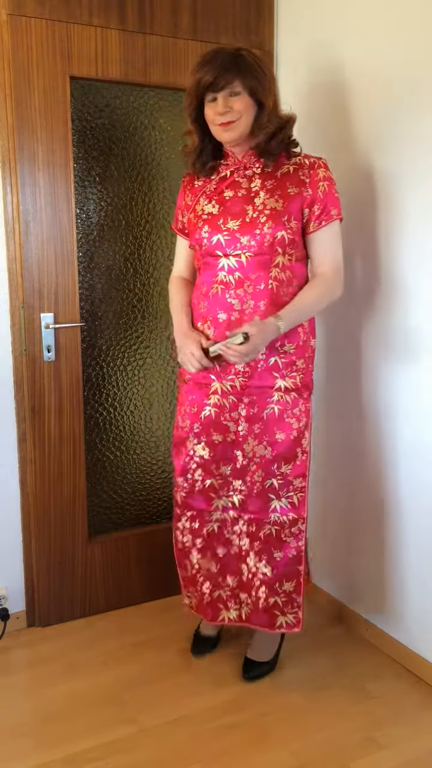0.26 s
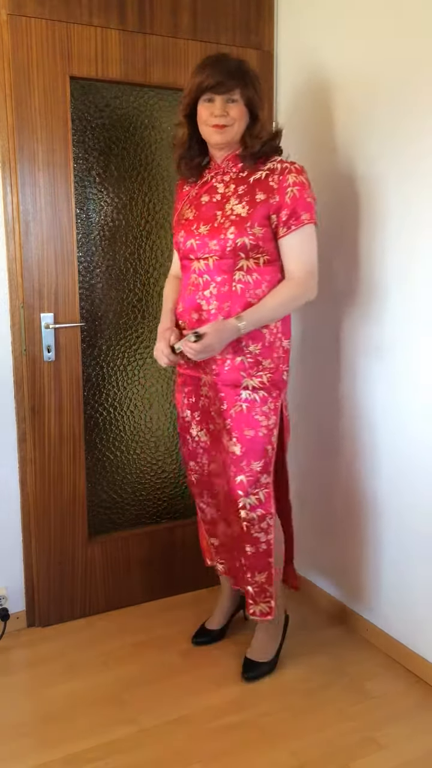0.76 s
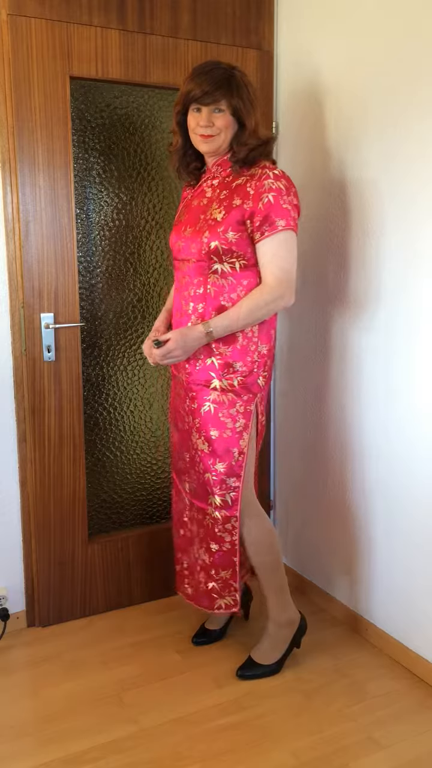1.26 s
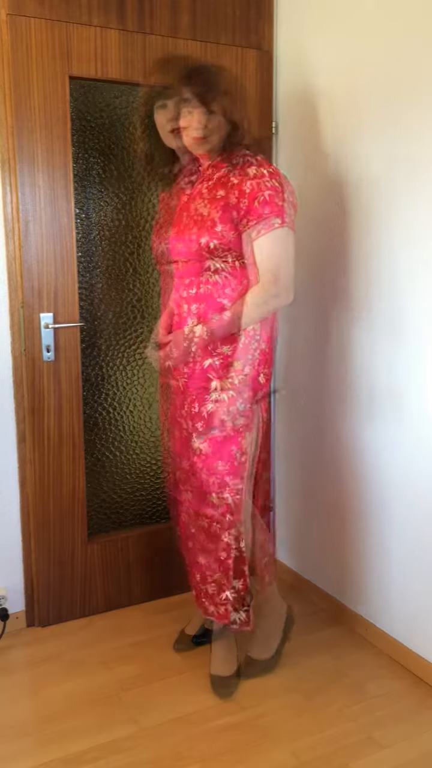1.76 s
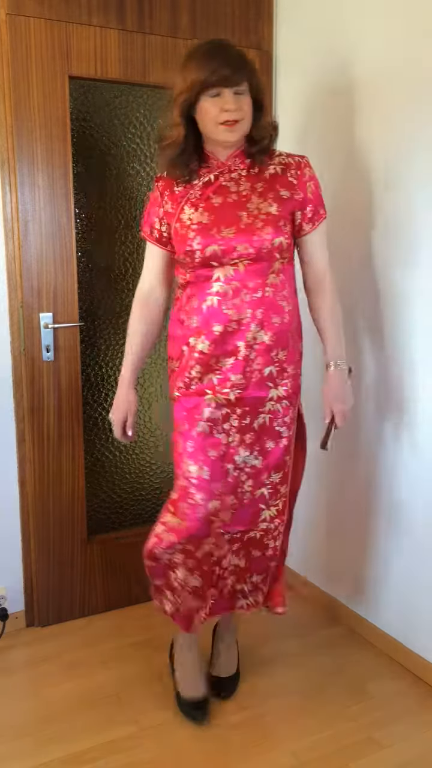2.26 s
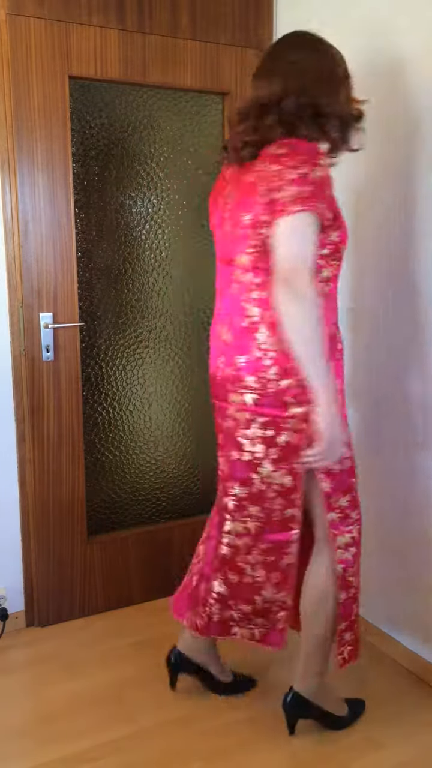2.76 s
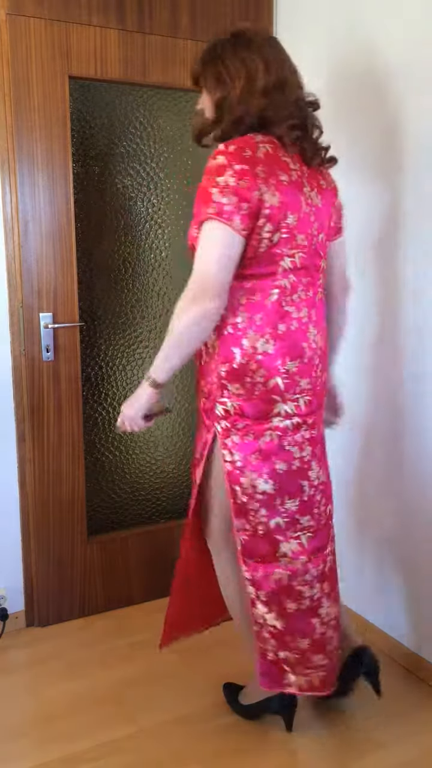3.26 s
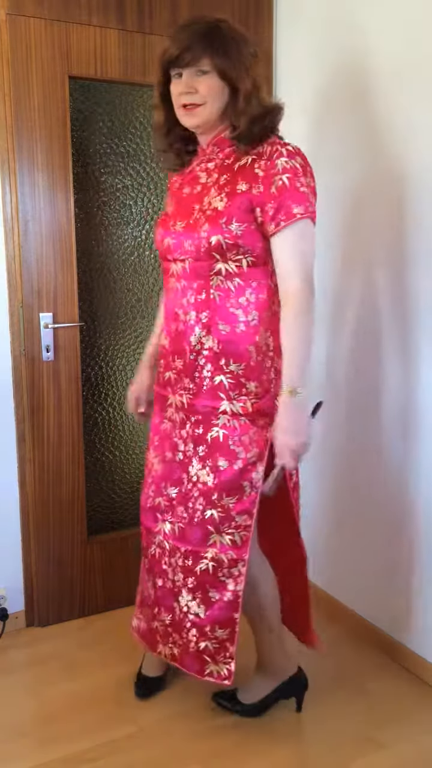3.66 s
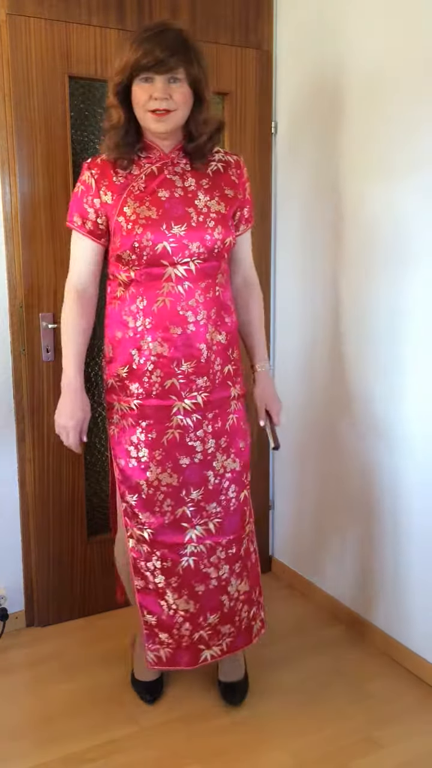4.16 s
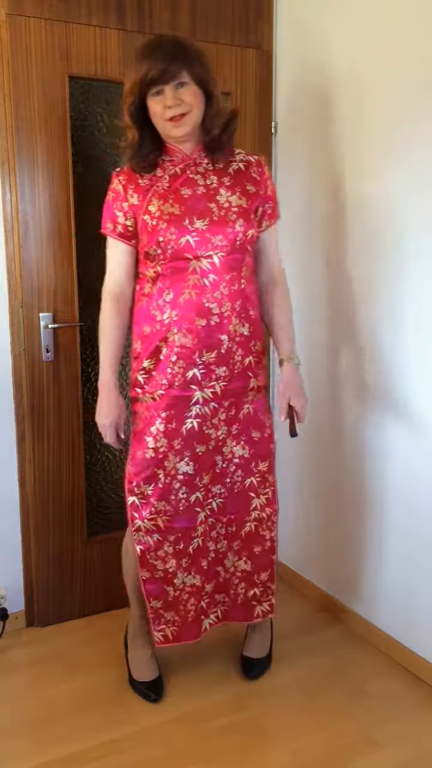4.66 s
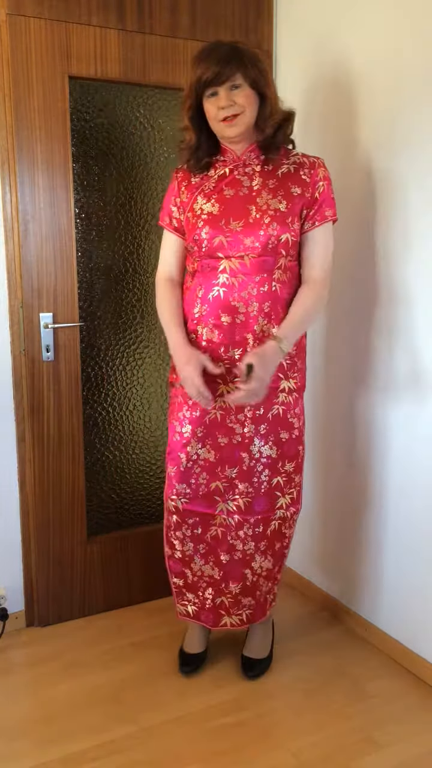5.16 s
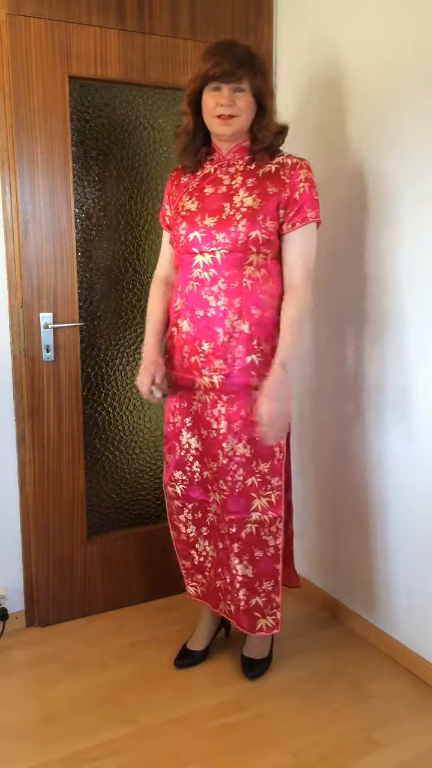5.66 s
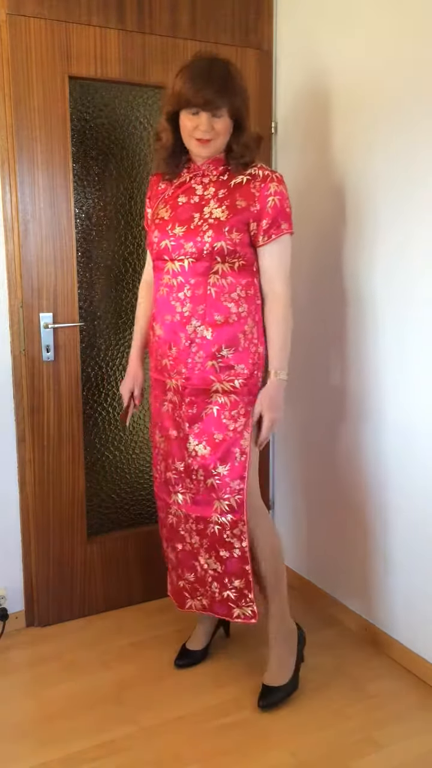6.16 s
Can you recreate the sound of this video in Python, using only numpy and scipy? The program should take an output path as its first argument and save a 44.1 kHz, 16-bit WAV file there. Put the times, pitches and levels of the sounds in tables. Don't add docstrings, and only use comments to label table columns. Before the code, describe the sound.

Someone in high heels shifts and turns on a laminate floor in a small, bare, lively room. One firm knock comes early, a softer one follows, then two loud steps with swishing satin. A short rising sole scrape marks the end of the turn, followed by lighter heel clicks and small thuds. The fairly close microphone has faint hiss and low building rumble.

```python
import sys
import numpy as np
from scipy import signal
from scipy.fft import rfft, irfft, next_fast_len
from scipy.io import wavfile
from scipy.ndimage import map_coordinates

SR = 44100
rng = np.random.default_rng(int(sys.argv[2]) if len(sys.argv) > 2 else 0)


def dump(signal):
    limited = np.clip(np.atleast_2d(signal).T, -1, 1)
    pcm = np.round(limited * 32767).astype(np.int16)
    wavfile.write(sys.argv[1], SR, pcm)


def magnitude_from_level(level_db):
    exponent = np.asarray(level_db, float) / 20
    return 10 ** exponent


N = 283122


def unit(x):
    return x / np.sqrt(np.mean(x ** 2) + 1e-20)


def peak(x):
    return x / np.max(np.abs(x))


def along(points, hz):
    point_hz, value = np.transpose(points)
    return np.interp(np.log(hz + 1), np.log(point_hz + 1), value)


def wobble(rate):
    knots = rng.standard_normal(int(N * rate / SR) + 4)
    return map_coordinates(knots, [np.arange(N) * rate / SR])


def filtered(x, response):
    size = next_fast_len(len(x) + 8192)
    hz = np.fft.rfftfreq(size, 1 / SR)
    return irfft(rfft(x, size) * response(hz), size)[:len(x)]


def modes(table):
    def response(f):
        return sum((-1) ** k * magnitude_from_level(db) * 1j * f * width / (hz * hz - f * f + 1j * f * width)
                   for k, (hz, width, db) in enumerate(table))
    return response


def stroke(t, rise_s, hold_s, ease_db, fall_db):
    rise = np.sin(np.pi / 2 * np.clip(t / rise_s, 0, 1)) ** 2
    return rise * magnitude_from_level(-ease_db * t - fall_db * np.maximum(t - rise_s - hold_s, 0))


# [pitch_hz, width_hz, level_db]
JOIST_MODES = [(81, 25.7, 0), (142.2, 13.1, -0.5), (172.3, 11.8, 5), (287, 210, -1.5), (336, 17, 2)]
# [pitch_hz, level_db per Hz]
QUIET_TONE = [(13, -47.5), (22, -8.5), (114, -1), (260, -13), (360, -11), (1300, -15.5), (3620, -23),
              (15500, -30.5)]
# [start_s (middle), swell_db]
WEIGHT_SHIFTS = [
    (1.4, 2),
    (1.8, 6.5),
    (2.78, 10),
    (3.82, 9.5),
    (4.64, 14),
    (5.0, 1.5),
    (5.4, 3),
]
QUIET_DB, HUM_DB = -64, -63
HUM_FADES_DB_PER_S = 1.46
SHIFT_S = 0.14


def quiet():
    t = np.arange(N) / SR
    hiss = unit(filtered(rng.standard_normal(N), lambda hz: magnitude_from_level(along(QUIET_TONE, hz))))
    load_db = sum(db * np.exp(-((t - s) / SHIFT_S) ** 2) for s, db in WEIGHT_SHIFTS)
    swell = magnitude_from_level(HUM_DB - HUM_FADES_DB_PER_S * t + load_db - 6 + 0.39 * wobble(3.8))
    rumble = unit(filtered(rng.standard_normal(N), lambda f: modes(JOIST_MODES)(f) / (1 + 1j * f / 250) ** 2))
    return magnitude_from_level(QUIET_DB - 3.5) * hiss + swell * rumble


# [pitch_hz, level_db per Hz]
SATIN_TONE = [(590, -28.5), (1000, -7), (1160, -8.5), (1350, -8), (2280, -7.5), (3870, -11), (12300, -17),
              (15500, -20.5)]
# [start_s, hold_s, level_db, fade_db_per_s]
SWISHES = [(0.0, 0.28, -66.5, 37), (0.807, 0.061, -73, 50), (1.255, .02, -70.5, 34),
           (1.474, 0.037, -70.5, 45), (1.707, 0.015, -62.5, 128), (1.784, 0.2, -69, 60),
           (2.055, 0.034, -63.5, 23), (2.318, 0.032, -71.5, 60), (2.588, 0.22, -59, 64),
           (2.965, 0.088, -55, 70), (3.592, 0.063, -54.5, 147), (3.738, .01, -58.5, 101),
           (3.85, 0.32, -64.5, 31.5), (4.149, 0.092, -64, 154), (4.46, 0.033, -77, 198),
           (4.795, 0.1, -71, 37), (5.508, 0.0072, -69, 158), (5.684, 0.049, -78.5, 62),
           (5.906, .02, -68, 90.5), (6.316, 0.096, -71.5, 53)]
# [start_s, peak_db, t60_s (time to fall 60 dB)]
TICKS = [(0.0437, -47, 0.014), (0.627, -58, 0.035), (0.8131, -59, 0.034), (2.1246, -60, 0.037),
         (2.722, -54, 0.03), (3.1418, -46, 0.031), (4.392, -57, 0.04), (4.583, -57.5, 0.046),
         (4.8937, -61, 0.032), (5.3774, -65, 0.042), (5.4594, -66.5, 0.1), (5.9192, -54, 0.017),
         (6.2787, -61.5, 0.036)]
SWISH_S, STILL_DB = .04, -81.5


def dress():
    t = np.arange(N) / SR
    power = magnitude_from_level(2 * STILL_DB)
    for s, hold, db, fade_db in SWISHES:
        power = power + (magnitude_from_level(db) * stroke(t - s + SWISH_S / 2, SWISH_S, hold, 0, fade_db)) ** 2
    grains = magnitude_from_level(1.1 * wobble(11) + 0.75 * wobble(31) + 1.0 * wobble(300))
    swish = np.sqrt(power) * grains
    ticks = 0
    for s, db, t60 in TICKS:
        onset = np.clip((t - s) / 0.0015, 0, 1)
        ticks = ticks + onset * magnitude_from_level(db - 0.5 - 60 * np.abs(t - s) / t60)
    cloth = unit(filtered(rng.standard_normal(N), lambda hz: magnitude_from_level(along(SATIN_TONE, hz))))
    return (swish + ticks) * cloth


# [delay_s, level_db]
WALL_ECHOES = [(.005, 2), (.0085, 0), (.013, -4.5), (.022, -19), (.026, -6.5), (.042, -12)]
# [pitch_hz, t60_s]
ROOM_RING = [(100, 0.47), (400, 0.31), (1100, 0.29), (3000, 0.34), (8000, 0.052)]
# [pitch_hz, level_db]
WALL_TONE = [(300, -2.5), (900, -2.5), (1800, 0), (2800, -5.5), (5000, -6.5)]


def room(x, wall_db, tail_db):
    size = SR // 2
    hz, t, noise = signal.stft(rng.standard_normal(size), SR, nperseg=256)
    fall_db = -60 * t / along(ROOM_RING, hz)[:, None]
    decay = magnitude_from_level(1.013 * fall_db) + magnitude_from_level(-17.5 + 0.56 * fall_db)
    colour = magnitude_from_level(along(WALL_TONE, hz))[:, None]
    tail = signal.istft(noise * decay * colour, SR, nperseg=256)[1][:size]
    tail = tail * (1 - np.exp(-np.arange(size) / SR / 0.0036))
    answer = magnitude_from_level(tail_db) * tail / np.linalg.norm(tail)
    for s, db in WALL_ECHOES:
        answer[round(s * SR)] += magnitude_from_level(db + wall_db) * rng.choice([-1, 1])
    answer[0] = 1
    return signal.fftconvolve(x, answer)


# [pitch_hz, width_hz, level_db]
GRIT_MODES = [(400, 310, -5.5), (1100, 680, -1), (2057, 570, 2.5), (2933, 700, 1)]
# [start_s, length_s, board_db, board_pitch_hz, grit_db]
SLIDES = [(0.0, .05, -58.5, 538, -61.5), (0.088, 0.21, -69.5, 720, -69.5), (0.396, .1, -63, 592, -72),
          (1.27, 0.074, -67, 780, -69.5), (2.121, .04, -63, 706, -67), (2.184, 0.056, -56.5, 878, -62.5),
          (2.581, 0.094, -53.5, 671, -53.5), (2.947, 0.23, -61, 666, -57), (3.571, 0.036, -50.5, 561, -52),
          (3.602, 0.084, -35.5, 558.7, -42.5), (3.777, .14, -70.5, 600, -64.5),
          (3.941, 0.21, -55.5, 565, -64), (4.141, 0.038, -57.5, 597, -56), (4.2, 0.097, -68.5, 495, -61.5),
          (5.181, 0.054, -79, 701, -70), (5.656, 0.18, -71, 639, -64.5), (6.008, .03, -82, 720, -66.5)]
GRIP_S = 0.016
EASE_DB_PER_S, LIFT_DB_PER_S = 36, 421.5
GLIDE_HZ_PER_S = 2300
HARD_DB, GLIDE_SOFTENS, LIGHT_BLURS = -36.5, 0.32, 0.29


def slides():
    out = np.zeros(N + SR)
    uneven = magnitude_from_level(3 * wobble(170))
    for s, length, board_db, board_hz, grit_db in SLIDES:
        start = round(s * SR)
        t = np.arange(0, length + 0.16, 1 / SR)
        slips = rng.standard_normal((3, len(t))) * uneven[start:][:len(t)]
        blur_hz = 140 * magnitude_from_level(LIGHT_BLURS * (HARD_DB - board_db))
        a, b = (filtered(slip, lambda f: 1 / (1 + 1j * f / blur_hz) ** 2) for slip in slips[:2])
        glide = GLIDE_HZ_PER_S * magnitude_from_level(GLIDE_SOFTENS * (board_db - HARD_DB))
        turn = 2 * np.pi * (board_hz * t + glide * t * t / 2)
        grip = (a * a + b * b) ** 0.32
        board = unit((a * np.cos(turn) + b * np.sin(turn)) / (grip + 1e-9))
        grit = unit(filtered(slips[2], lambda f: modes(GRIT_MODES)(f) / (1 + 1j * f / 3500) ** 2))
        press = stroke(t, GRIP_S, length - GRIP_S, EASE_DB_PER_S, LIFT_DB_PER_S)
        scrape = press * (magnitude_from_level(board_db) * board + magnitude_from_level(grit_db) * grit)
        scrape = filtered(scrape, lambda f: (1j * f / (200 + 1j * f)) ** 6)
        near = room(scrape, wall_db=-9.5, tail_db=-16.0)
        out[start:][:len(near)] += magnitude_from_level(-2.5) * near
    return out[:N]


def pulse(points):
    size = 4096
    spectrum = magnitude_from_level(along(points, np.fft.rfftfreq(size, 1 / SR)))
    cepstrum = irfft(np.log(spectrum + 1e-6), size)
    cepstrum[1:size // 2] *= 2
    cepstrum[size // 2 + 1:] = 0
    return irfft(np.exp(rfft(cepstrum)), size)


def spread(x, count):
    centres_hz = rng.uniform(650, 2570, count)

    def lag(f):
        return np.prod([(c * c - f * f - 1j * f * 420) / (c * c - f * f + 1j * f * 420)
                        for c in centres_hz], axis=0)
    return filtered(x, lag)


PART_HZ = [478, 720, 1157, 1850, 2642]
# [start_s, board_peak_db, then beside it low_board_db, sole_db, shaft_db]
STEPS = [(0.012, -62.5, 5, -9.5, -5), (0.04, -56.5, 0.5, 4, 1.5), (0.395, -49.5, -5.5, -7, -12.5),
         (0.624, -21, -19, -6, -17), (1.262, -45, -21, -13, -22), (1.714, -50.5, -6.5, 7.5, 3.5),
         (1.937, -32.5, -6, 2.5, -14.5), (2.723, -16.5, -14, -9, -15), (3.142, -11, -15, -6.5, -13),
         (3.744, -53.5, 8, 15.5, 9), (3.935, -44, -4.5, -31, -18), (3.962, -62, 8, -9, -17),
         (4.394, -38, -2.5, -22, -11.5), (4.416, -44.5, 0, -13.5, -21), (4.587, -31, -14, -3.5, -8),
         (4.749, -46.5, -8, -4.5, -15), (5.522, -34.5, -5.5, 4, -9.5), (6.157, -66.5, -6.5, -4, -12)]
TIP_UNDER_DB, TIP_DULLS = 14, 0.17
ROOM_DB = -2


def steps():
    out = np.zeros(N + SR)
    touch = round(0.003445 * SR)
    for s, db, low_db, sole_db, shaft_db in STEPS:
        tip_db = shaft_db - TIP_UNDER_DB - TIP_DULLS * db
        struck = [low_db + 10.5, 0, sole_db - 5.5, shaft_db - 4.0, tip_db + 2]
        below = [(150, low_db - 19), (300, low_db - 2)]
        above = [(3400, tip_db - 11), (4200, tip_db - 26), (6000, tip_db - 25), (16000, tip_db - 53.5)]
        knock = spread(pulse(below + list(zip(PART_HZ, struck)) + above), count=5)
        blow = np.pad(knock, (touch, 0)) + magnitude_from_level(-25) * np.pad(knock, (0, touch))
        near = room(blow, wall_db=ROOM_DB - 8.0, tail_db=ROOM_DB - 4.5)
        out[round((s - .0035) * SR):][:len(near)] += magnitude_from_level(db + 35.5) * near
    return out[:N]


# [start_s, peak_db, strongest_pitch_hz]
THUMPS = [(0.619, -39, 194), (1.929, -36, 250), (2.341, -50, 107), (2.375, -69, 86.1), (2.6, -55, 282),
          (2.716, -41.5, 243), (3.134, -35, 184), (3.735, -66, 72), (3.938, -48.5, 227),
          (4.397, -43.5, 310), (4.581, -49.5, 101), (4.749, -43.5, 188), (5.034, -60.5, 123.7),
          (5.515, -41, 92)]


def thumps():
    out = np.zeros(N + SR)
    push = (np.arange(SR // 4) == 0) * 1.0
    sag = peak(filtered(push, lambda f: modes([(45, 50, 0)])(f) ** 2))
    for s, db, hz in THUMPS:
        def joists(f):
            weight = modes([(hz, 1.4 * hz, 0)])(f) ** 2
            return modes(JOIST_MODES)(f) * weight / (1 + 1j * f / 300) ** 2
        flex = peak(filtered(push, joists))
        near = room(flex + magnitude_from_level(-23.0) * sag, wall_db=-4, tail_db=-5.0)
        out[round((s + .005) * SR):][:len(near)] += magnitude_from_level(db - 4.0) * near
    return out[:N]


# [start_s, peak_db, pitch_hz]
CAPS = [
    (0.625, -51, 2640),
    (1.937, -54, 2900),
    (4.3954, -41, 2410),
    (4.586, -44, 3060),
    (5.521, -53, 2670),
    (5.521, -50.5, 4070),
    (5.9198, -67, 3300),
]


def caps():
    t = np.arange(N) / SR
    out = np.zeros(N)
    for s, db, hz in CAPS:
        age = t - s
        fade = magnitude_from_level(-60 * np.abs(age) / 0.047)
        onset = np.clip(age / 0.00017, 0, 1)
        out += magnitude_from_level(db - 6.5) * onset * fade * np.sin(2 * np.pi * hz * age)
    return out


def scene():
    return (quiet() + dress() + slides() + steps() + thumps() + caps())[None]


def low_pass(x):
    return signal.sosfilt(signal.butter(12, 15660, fs=SR, output="sos"), x)


def record(dry):
    kept = filtered(dry[0], lambda hz: hz < 15500)
    return low_pass(kept[None])


dry = scene()
out = record(dry)
dump(out)
```